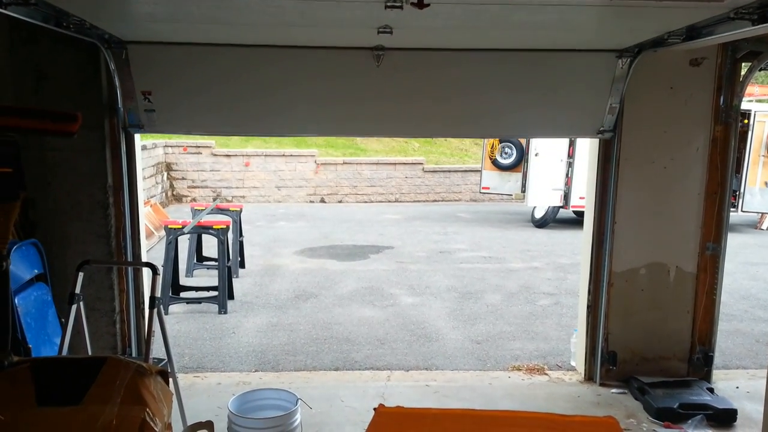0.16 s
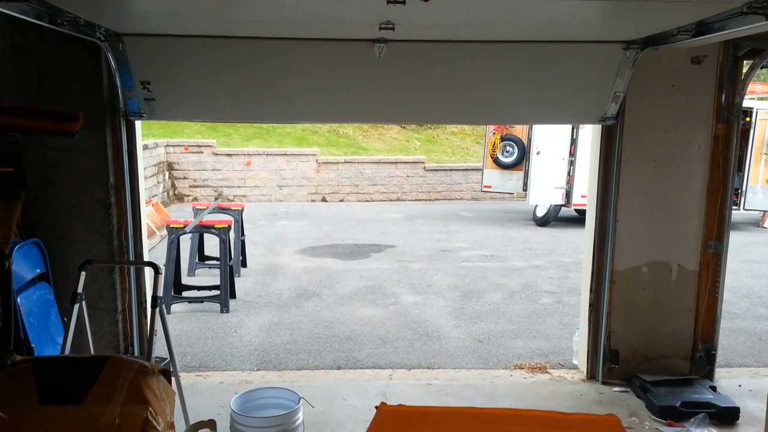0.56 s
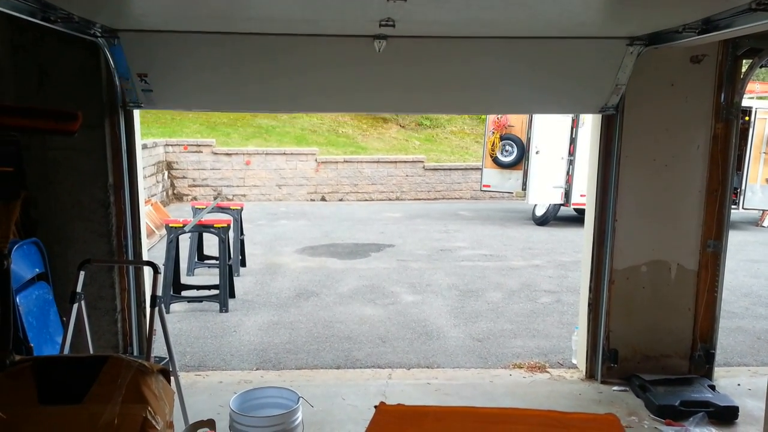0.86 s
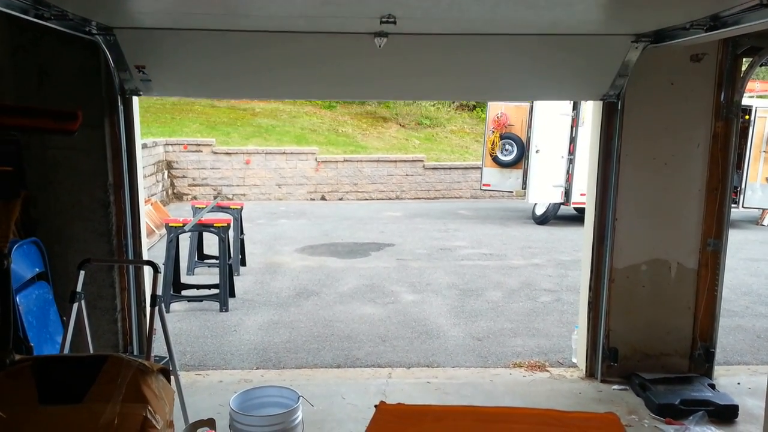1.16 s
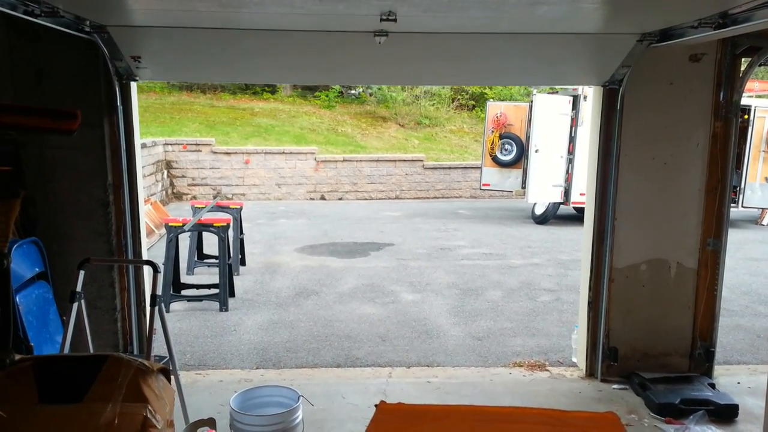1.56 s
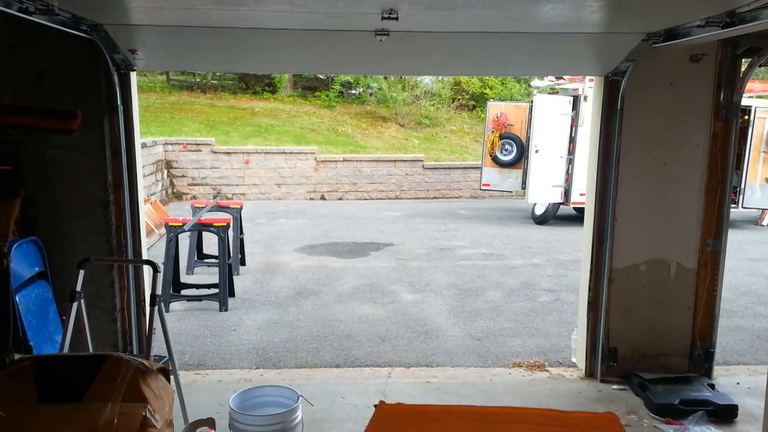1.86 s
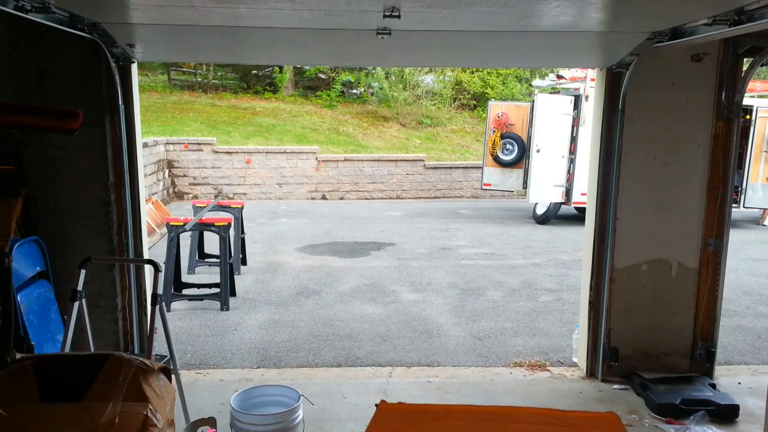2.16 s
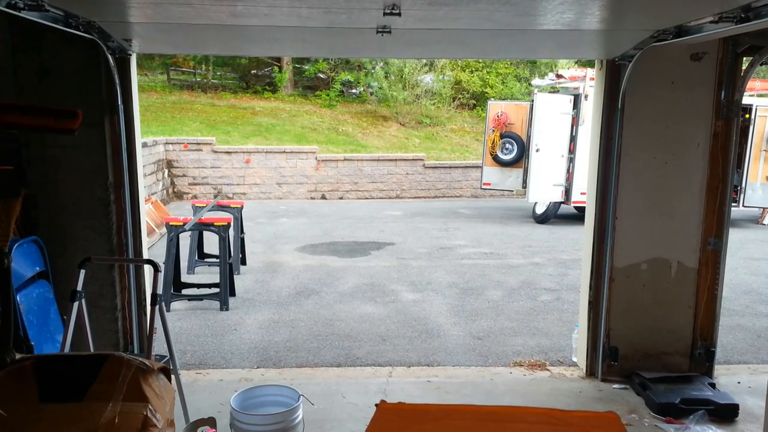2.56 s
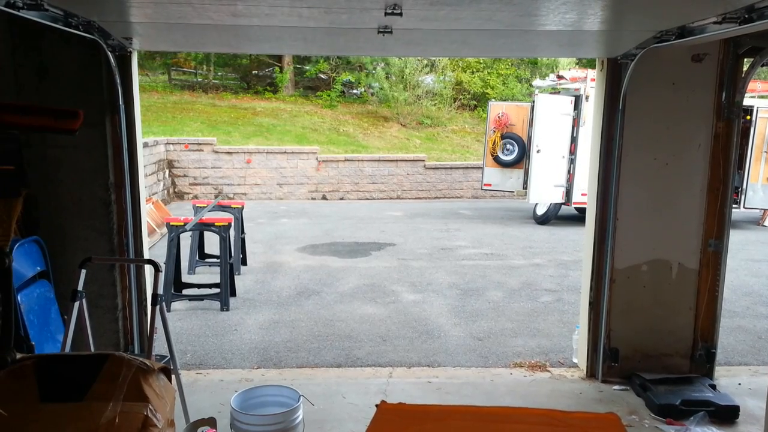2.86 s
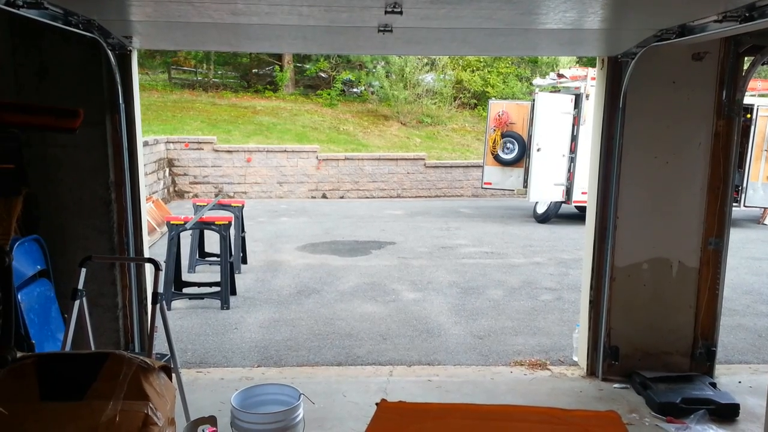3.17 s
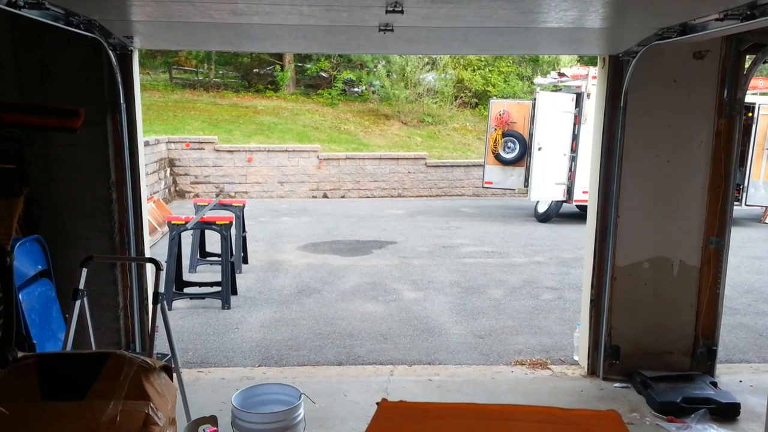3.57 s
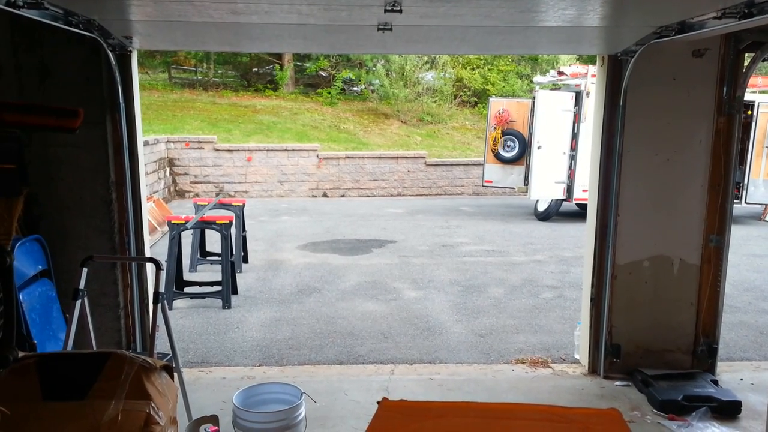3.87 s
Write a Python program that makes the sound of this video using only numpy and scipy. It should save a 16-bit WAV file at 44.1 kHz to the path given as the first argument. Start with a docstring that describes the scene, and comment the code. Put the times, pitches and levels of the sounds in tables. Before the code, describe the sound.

A garage door is already moving, rumbling and rattling steadily up its tracks. Small clanks come from 0.5 seconds, with a brief metallic scrape near 1.2. Thin, wavering squeals or bird-like whistles around 4-5 kHz run from 0.5 to 2.6, echoing slightly. A loud steel clank at 2.7 ends the motion. Near silence follows, with a clank at 2.95 and a falling chirp at 3.05. From 3.7, sharp clacks, rumble and rising motor hum restart.

```python
"""In a garage, a motor-driven sectional door rumbles and rattles up its tracks, clanks to a stop and starts again.
Filtered noise makes the rumble and roll; random ticks exciting decaying modes make the rattle and a scrape.
Clanks are noise bursts with steel modes and a thud; a modulated sine is the motor hum.
Gliding sines, squeals of the rollers or a bird outside, whistle and reverberate in the garage.
Outdoor hush lies behind; a noise gate lowers the quiet gaps over a faint hiss."""
import sys
import numpy as np
from scipy import signal
from scipy.fft import rfft, irfft
from scipy.io import wavfile
from scipy.ndimage import uniform_filter1d

SR = 44100
rng = np.random.default_rng(int(sys.argv[2]) if len(sys.argv) > 2 else 0)


def master(y):
    """Save y as 16-bit WAV."""
    cut = np.clip(np.atleast_2d(y).T, -1, 1)
    pcm = np.round(cut * 32767)  # scale
    wavfile.write(sys.argv[1], SR, pcm.astype(np.int16))


N = 176400  # samples: 4 s


def amp(db):
    """Level to amplitude: 20 dB is a factor of ten."""
    return 10 ** (np.asarray(db) / 20)


def evened(x):
    """Normalisation to unit root-mean-square, over both channels together."""
    return x / np.sqrt(np.mean(x ** 2) + 1e-20)


def read(points, hz):
    """Interpolation of a spectrum along a logarithmic frequency axis."""
    f, value = np.transpose(points)
    return np.interp(np.log(hz + 1), np.log(f + 1), value)


def add(mix, s, sound):
    """Superposition: adds a sound from time s on, cut at the end of the mix."""
    part = mix[..., round(s * SR):][..., :sound.shape[-1]]
    part += sound[..., :part.shape[-1]]


def colour(x, spectrum, skirt_db=-30):
    """Linear filtering: multiplies by a spectrum that drops away beyond its ends."""
    (low_hz, low_db), (high_hz, high_db) = spectrum[0], spectrum[-1]
    below = (low_hz * 0.45, low_db + skirt_db)
    above = (high_hz * 1.3, high_db + skirt_db)
    gain_db = read([below, *spectrum, above], np.fft.rfftfreq(x.shape[-1], 1 / SR))
    return irfft(rfft(x) * amp(gain_db), x.shape[-1])


def spread(pair):
    """Interaural coherence: mixes two unrelated signals into a partly alike left and right."""
    # likeness of left and right: f/Hz, coherence (1 = identical)
    coherence = [(60, 0.96), (180, 0.96), (530, 0.77), (1580, 0.017), (4710, 0.17), (14000, 0.022)]
    z = rfft(pair)
    same = np.clip(read(coherence, np.fft.rfftfreq(N, 1 / SR)), -1, 1)
    return irfft([z[0], same * z[0] + np.sqrt(1 - same ** 2) * z[1]], N)


def patchy(patchy_db, size):
    """Non-stationary noise: its level drifts in patches over time and pitch."""
    overlap = size * 3 // 4
    z = signal.stft(rng.standard_normal((2, N)), nperseg=size, noverlap=overlap)[2]
    across_pitch = uniform_filter1d(rng.standard_normal(z.shape[1:]), 4, 0)
    patches = evened(uniform_filter1d(across_pitch, 8, 1))
    noise = signal.istft(z * amp(patchy_db * patches), nperseg=size, noverlap=overlap)[1]
    return spread(noise[:, :N])


def ring(modes, t):
    """Modal superposition: sines of random phase that each lose 60 dB in their t60."""
    return sum(amp(db - 60 * t / t60) * np.sin(2 * np.pi * (hz * t + rng.random())) for hz, db, t60 in modes)


def air():
    """Broadband ambient noise: an outdoor hush, with a faint tone whose phase wanders at random."""
    # hush spectrum: f/Hz, relative level per Hz/dB
    air_spectrum = [(30, -2), (160, -7.5), (420, -15.5), (900, -14.5), (3150, -16.5), (6160, -12),
                    (11500, -15), (13000, -35), (14500, -53)]
    # faint steady tone: f/Hz, level/dB
    thin_tones = [(6000, -63.5)]
    hush_db = -57.5
    t = np.arange(N) / SR
    tones = 0
    for hz, db in thin_tones:
        wander = np.cumsum(0.02 * rng.standard_normal((2, N)), 1)  # cycles
        tones = tones + amp(db) * np.sin(2 * np.pi * (hz * t + wander))
    return amp(hush_db) * evened(colour(patchy(patchy_db=2.5, size=1024), air_spectrum)) + tones


def motor():
    """Frequency and amplitude modulation: a rising, slightly unsteady hum as the motor pulls away again."""
    # motor hum: t/s, f/Hz, level/dB
    hum_path = [(3.75, 254, -52), (3.82, 256.6, -43.5), (4, 259, -39.5)]
    s, hz, db = np.transpose(hum_path)
    t = np.arange(N) / SR
    phase = 2 * np.pi * np.cumsum(np.interp(t, s, hz)) / SR
    unsteady = 1 + 0.16 * np.sin(2 * np.pi * 17 * t)
    return amp(np.interp(t, s, db, left=-120)) * unsteady * np.sqrt(2) * np.sin(phase)


def garage(x):
    """Diffuse reverberation: sparse taps of random sign decay exponentially, independently at each side."""
    t60_s, level_db = 0.46, 1
    taps = np.zeros((2, SR // 2))
    slots = np.arange(200, SR // 2 - 20, 20)
    at = slots + rng.integers(0, 20, (2, len(slots)))
    decaying = rng.choice([-1., 1.], at.shape) * amp(-60 * at / SR / t60_s)
    np.put_along_axis(taps, at, decaying, 1)
    return amp(level_db) * signal.fftconvolve(x, taps / np.linalg.norm(taps[0]), axes=1)[:, :N]


def whistles():
    """Frequency modulation: thin wavering tones glide, mostly down, some with a trill."""
    # whistles: start t/s, length/s, start f/Hz, end f/Hz, bend (over 1 swoops early),
    # relative level/dB, loudest at (share of length), trill depth (0-1), waver/Hz
    glides = [(0.46, 0.37, 4260, 4430, 0.99, -50, 0.66, 0.1, 30),
              (0.873, 0.17, 4340, 4300, 1.35, -42.5, 0.6, 0, 30),
              (1.031, 0.48, 4485, 4360, 0.22, -39.5, 0.31, 0, 22),
              (1.482, 0.168, 4306, 4213, 0.78, -43, 0.75, 0.1, 25),
              (1.547, 0.12, 8160, 7670, 1.3, -53.5, .4, 0.6, 30),
              (1.775, 0.062, 5160, 4760, 1.36, -39.5, 0.4, 0.15, 60),
              (1.828, 0.28, 4720, 4216, 1.58, -41, 0.46, 0.84, 30.4),
              (2.185, .26, 4620, 4310, 1.49, -44, 0.62, 1, 50),
              (2.448, 0.205, 4600, 4630, 1.05, -51, .3, 0.8, 120),
              (3.051, 0.18, 5030, 4580, 4.5, -40.5, 0.25, 0.09, 29.5)]
    trill_hz, trill_swing_hz, trill_jitter = 37.35, 120, 0.116
    onset_waver_hz = 119  # roughness at the start, per kHz of glide
    swell_power, flutter_db, overtone_db = 0.25, 2.5, -32
    out = np.zeros(N)
    for s, length, from_hz, to_hz, bend, db, top, trill, waver_hz in glides:
        t = np.arange(0, length, 1 / SR)
        fall = (1 - t / length) ** bend
        waver, jitter, flutter = (
            evened(uniform_filter1d(rng.standard_normal(len(t)), size=size)) for size in (250, 1500, 200))
        onset = onset_waver_hz * fall ** 2 * abs(from_hz - to_hz) / 1000
        wobble = (waver_hz + onset) * waver
        beat = 2 * np.pi * np.cumsum(trill_hz * (1 + trill_jitter * jitter)) / SR
        trill = trill * (1 - fall)  # the trill sets in as the glide settles
        hz = to_hz + (from_hz - to_hz) * fall + wobble + trill * trill_swing_hz * np.sin(beat)
        phase = 2 * np.pi * np.cumsum(hz) / SR
        rise_and_fall = np.minimum(t / top, (length - t) / (1 - top)) / length
        shape = np.clip(rise_and_fall, 0, 1) ** swell_power
        shape = shape * (1 + trill * np.cos(beat)) * amp(flutter_db * flutter)
        add(out, s, amp(db) * shape * (np.sin(phase) + amp(overtone_db) * np.sin(2 * phase)))
    return out


def clanks():
    """Impact excitation: each blow is a crack of noise, ringing steel and a dull thud of the panel."""
    # blows: t/s, relative level/dB, thud relative level/dB, left-right/dB, t60/s (at least 0.02 is used),
    # brightness/dB per octave
    blows = [(0.4774, -30, -2.5, 2, 0.15, -12), (0.6225, -25.5, -5.5, -2, 0.17, -7.5),
             (0.7482, -28, -9, 3, 0.34, 0.1), (0.8683, -28.5, -1.5, -2, 0.26, -5),
             (1.4529, -27, -3.5, 0, 0.3, -5), (1.8967, -36, -2.5, -5, 0.25, -19),
             (1.936, -28.5, -9, -1, 0.097, 2.5), (2.2696, -31.5, -19, -3, 0.099, -6),
             (2.5955, -30.5, -12, 5, 0.4, -3.5), (2.6763, -14.5, -40, -0.5, 0.18, 0.9),
             (2.6902, -25, -41, 4, 0.25, 0), (2.9488, -23.5, -7, 0, 0.22, 3.5),
             (3.7004, -22.5, -23, -0.5, 0.15, 11.5), (3.7294, -27, -7, -0.5, 0.17, 3.5),
             (3.912, -19.5, -24, -2, 0.18, 0.6)]
    # crack spectrum before the brightness tilt: f/Hz, relative level per Hz/dB
    crack_spectrum = [(900, -12.5), (2100, -7.5), (2500, -8.5), (3500, -6.5), (4400, 0.5), (5250, -7),
                      (6000, -7), (6500, 0.5), (7300, -8.5), (8100, -14.5), (14500, -29.5)]
    # steel modes: f/Hz, relative level/dB, t60/s
    steel_modes = [(2240, -8, 0.2), (2650, -4, 0.13), (3450, -19, 0.23), (4120, -23, 0.18),
                   (5840, -21, 0.42), (5970, -15, 0.12), (6800, -14, 0.17), (8140, -17, 0.023)]
    # thud spectrum: f/Hz, relative level per Hz/dB
    thud_spectrum = [(200, -25), (320, -2), (440, -0.5), (600, 1), (750, -12), (1100, -13)]
    thud_t60_s = 0.12
    out, t = np.zeros((2, N)), np.arange(SR // 3) / SR
    for s, db, thud_db, pan_db, t60, tilt_db in blows:
        decay_db = -60 * t / max(t60, .02)
        tilted = [(hz, d + tilt_db * np.log2(hz / 4000)) for hz, d in crack_spectrum]
        crack = evened(colour(rng.standard_normal((2, len(t))), tilted))
        crack = crack * (amp(-60 * t / 0.032) + 0.58 * amp(decay_db))  # a snap, then a tail
        steel = ring(steel_modes, t) * amp(-15 + decay_db)
        thud = evened(colour(rng.standard_normal(len(t)), thud_spectrum)) * np.minimum(t / 0.00072, 1)
        thud = thud * amp(thud_db - 60 * (t / thud_t60_s) ** 1.5)
        pan = amp([[pan_db / 2], [-pan_db / 2]])
        blow = ((crack + steel) * pan + thud) * np.minimum(t / 0.0011, 1)
        add(out, s - .001, amp(db - 7) * blow)
    return out


def travel(axis):
    """Amplitude envelope: gain of one layer of the moving door, all but silent while it stands."""
    # door moving, coming to a stop and restarting, each with columns: t/s,
    # panel rumble relative level/dB, roller roll relative level/dB, track rattle relative level/dB
    lift = [(0.0, -39, -36.5, -41.5), (0.29, -40.5, -42.5, -44.5), (0.31, -41, -36.5, -40.5),
            (0.37, -38, -41.5, -45.5), (0.45, -40.5, -43, -47.5), (0.66, -41, -40.5, -44),
            (0.67, -41, -42, -46), (0.86, -40.5, -39, -39.5), (0.87, -39, -37.5, -36),
            (0.9, -36.5, -38.5, -39), (1.14, -41.5, -38, -40), (1.21, -38, -34.5, -39.5),
            (1.29, -38.5, -42, -47.5), (1.36, -41.5, -42, -48.5), (1.44, -38.5, -44.5, -47),
            (1.84, -39, -42, -48.5), (1.88, -40, -50, -48.5), (1.9, -42, -39, -45.5),
            (1.98, -40, -45.5, -50.5), (2.42, -41.5, -44.5, -52), (2.52, -40, -41.5, -53),
            (2.56, -43.5, -52.5, -50.5), (2.6, -39.5, -40, -51), (2.66, -43, -44, -44.5)]
    stop = [(2.73, -41.5, -49.5, -50), (2.76, -47, -55, -51.5), (2.8, -53, -61, -68), (2.9, -73, -87, -94)]
    restart = [(3.685, -80, -62, -57), (3.72, -52, -51, -52), (3.735, -47, -36.5, -47),
               (3.78, -40, -47.5, -55.5), (3.83, -44, -50, -68), (3.9, -43.5, -49, -75),
               (3.94, -45.5, -50.5, -49), (4.0, -43, -47.5, -55.5)]
    t = np.arange(N) / SR
    gain = 0
    for run in ([*lift, *stop], restart):
        s, db = np.transpose(run)[[0, axis]]
        gain = gain + amp(np.interp(t, s, db, left=-120, right=-120))
    return gain


def panel_rumble():
    """Forced resonance: low noise plus noise exciting the boom modes of the panels."""
    # rumble spectrum: f/Hz, relative level per Hz/dB
    rumble_spectrum = [(15, -59), (25, -33), (46, -24), (65, -15), (109, -2.5), (152, -3.5), (200, -1.5),
                       (313, -6), (360, -12.5), (420, -10), (550, -37), (920, -120)]
    # panel modes: f/Hz, relative level/dB, t60/s
    panel_modes = [(118.7, -4.5, 0.21), (189.2, -1, 0.15), (257.3, 1, 0.13), (308.6, 1, 0.12),
                   (459, -1, 0.11), (552, -3.5, 0.15)]
    t = np.arange(6000) / SR
    booms = signal.oaconvolve(patchy(patchy_db=4, size=2048), ring(panel_modes, t)[None])[:, :N]
    rumble = evened(colour(patchy(patchy_db=0.0, size=2048), rumble_spectrum))
    return amp(-1.0) * travel(axis=1) * (rumble + amp(-3.5) * evened(booms))


def roller_roll():
    """Rolling contact noise: patchy noise of the rollers, following the door's motion."""
    # roll spectrum: f/Hz, relative level per Hz/dB
    roll_spectrum = [(190, -26), (330, -5), (405, -14), (444, -7.5), (585, -0.5), (1170, -6), (1820, -8),
                     (2120, -7), (2420, -12.5), (3800, -17), (4940, -39), (8360, -120)]
    roll = evened(colour(patchy(patchy_db=2.0, size=1024), roll_spectrum))
    return amp(0.13) * travel(axis=2) * roll


def hail():
    """Shot noise: a dense hail of small ticks, a few larger, over a patchy hiss."""
    ticks_per_s, tick_spread_db = 3500, 3.5
    sizes = amp(tick_spread_db * np.minimum(rng.exponential(1, (2, N)), 4))
    ticks = sizes * (rng.random((2, N)) < ticks_per_s / SR) * rng.choice([-1, 1], (2, N))
    return evened(spread(ticks)) + 1.25 * evened(patchy(patchy_db=2.5, size=512))


def track_rattle_and_scrape():
    """Modal excitation: ticks rattle and ring the steel track, and once a roller drags and rings it."""
    # rattle spectrum: f/Hz, relative level per Hz/dB
    rattle_spectrum = [(1410, -26), (2400, -6), (3770, -6.5), (4380, 1), (6330, -4), (8610, -13.5),
                       (12500, -25), (14000, -80), (14500, -80)]
    # track modes: f/Hz, t60/s, relative level/dB
    track_modes = [(1300, 0.057, -16.5), (2143, 0.025, 0), (3258, 0.012, 2.5), (3530, 0.04, -4.5),
                   (3870, 0.024, -3.5), (4420, 0.013, -6.5), (5690, 0.071, -9), (6400, 0.014, -0.5),
                   (6880, 0.023, -32)]
    ring_db, ring_swell_db = -8, 2
    scrape_s, scrape_rise_s, scrape_t60_s, scrape_db = 1.168, 0.016, 0.24, -29
    t = np.arange(6000) / SR
    ticks = hail()
    steady, fitful = 0, 0
    for hz, t60, db in track_modes:
        mode = signal.oaconvolve(ticks, ring([(hz, db, t60)], t)[None])[:, :N]
        drift = uniform_filter1d(uniform_filter1d(rng.standard_normal(N), size=2500), size=1000)
        steady = steady + mode
        fitful = fitful + amp(ring_swell_db * np.tanh(evened(drift))) * mode  # each comes and goes by itself
    rattle = evened(colour(hail(), rattle_spectrum)) + amp(ring_db) * evened(fitful)
    since = np.maximum(np.arange(N) / SR - scrape_s, 0)
    scrape_gain = np.minimum(since / scrape_rise_s, 1) * amp(scrape_db - 60 * (since / scrape_t60_s) ** 2)
    scrape = 0.59 * evened(steady) + 0.72 * evened(colour(ticks, rattle_spectrum))
    return amp(4.5) * travel(axis=3) * rattle + scrape_gain * scrape


def door():
    """Superposition of the moving door's parts: panels, rollers and track."""
    return panel_rumble() + roller_roll() + track_rattle_and_scrape()


def scene():
    """Linear superposition of all sources; only the whistles reverberate."""
    whistle = whistles()[None]
    return air() + motor() + garage(whistle) + 0.98 * whistle + clanks() + door()


def record(dry):
    """Transduction: bass cut, microphone lean, a gate that lowers quiet moments, hiss, then the band limit."""
    # stereo lean of the microphones: f/Hz, left-right/dB
    lean_points = [(60, -2), (180, -0.5), (530, 1.5), (1580, 2.5), (4710, -1), (14000, -9)]
    # microphone hiss spectrum: f/Hz, relative level per Hz/dB
    hiss_spectrum = [(35, -44), (60, -2), (97, 0), (432, -8), (3040, -20.5), (6190, -12.5), (11200, -25),
                     (14500, -33)]
    bass_cut_hz, edge_hz, hiss_db = 45, 14400, -70
    # at gate_db the cut equals gate_depth_db; below, it deepens by a factor e per gate_soft_db
    gate_db, gate_depth_db, gate_soft_db = -58, 21.5, 5
    lean = read(lean_points, np.fft.rfftfreq(N, 1 / SR)) / 2
    dry = signal.sosfilt(signal.butter(2, bass_cut_hz, "high", fs=SR, output="sos"), dry)
    x = irfft(rfft(dry) * amp([lean, -lean]), N)
    power = signal.lfilter(np.ones(900) / 900, 1, (x ** 2).mean(0))
    power_db = 10 * np.log10(abs(power) + 1e-12)
    shut = np.exp((gate_db - power_db) / gate_soft_db)
    hiss = amp(hiss_db) * evened(colour(patchy(patchy_db=3.0, size=1024), hiss_spectrum))
    x = x * amp(-gate_depth_db * shut) + hiss
    band_limit = signal.firwin(511, edge_hz, window=("kaiser", 9), fs=SR)
    return signal.oaconvolve(x, band_limit[None], "same")


dry = scene()
out = record(dry)
master(out)
```